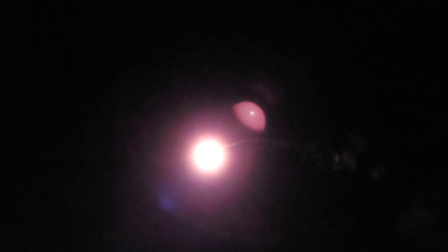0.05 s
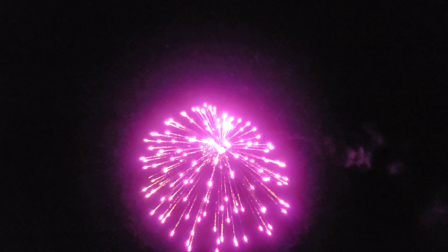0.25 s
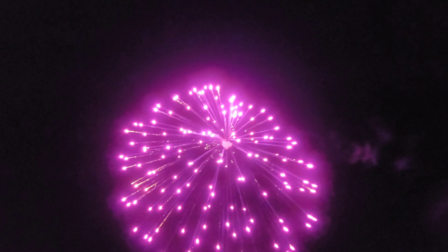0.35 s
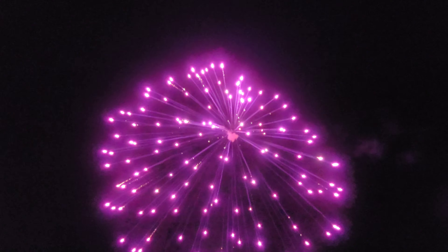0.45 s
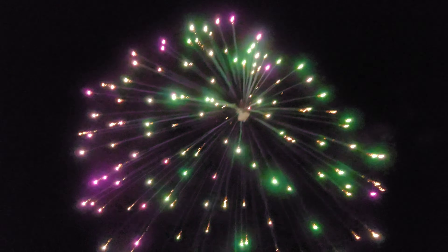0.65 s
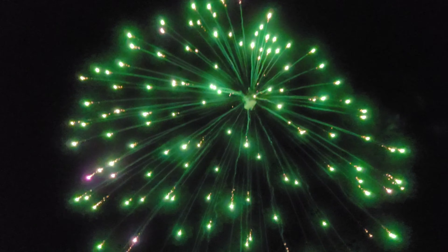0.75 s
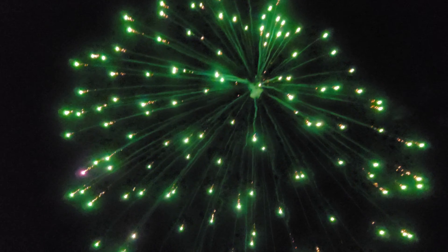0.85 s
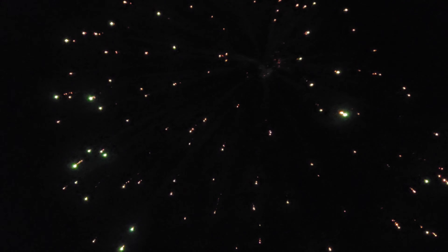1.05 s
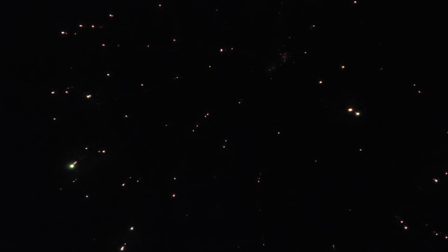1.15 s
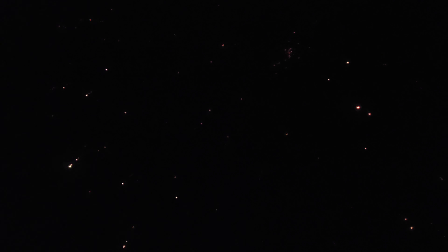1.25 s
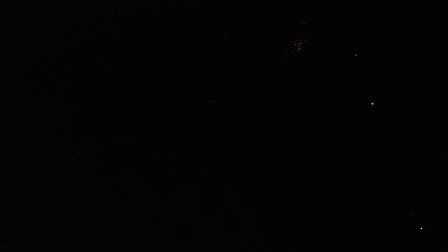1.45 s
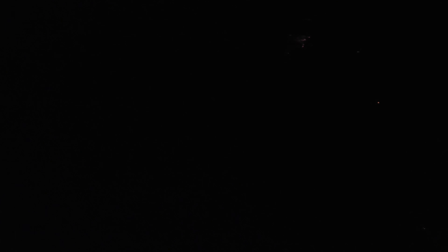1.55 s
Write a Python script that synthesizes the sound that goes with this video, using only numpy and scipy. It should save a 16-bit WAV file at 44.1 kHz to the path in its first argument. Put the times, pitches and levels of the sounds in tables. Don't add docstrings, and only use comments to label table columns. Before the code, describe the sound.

Single hard firework explosion at night, quick slapping echoes, then a deep fading boom over open ground

```python
import sys
import numpy as np
from scipy import signal
from scipy.io import wavfile

SR = 44100
rng = np.random.default_rng(int(sys.argv[2]) if len(sys.argv) > 2 else 0)


def voltage_ratio(level):
    return 10 ** (np.asarray(level, float) / 20)


def master_out(mix):
    frames = np.transpose(np.atleast_2d(mix))
    ceiling = np.clip(frames, -1, 1)
    pcm = np.round(ceiling * 32767).astype(np.int16)
    wavfile.write(sys.argv[1], SR, pcm)


N = 70560

SHOCK_S = .2477
LAG_S = .00048


def rms_one(x):
    return x / np.sqrt(np.mean(x ** 2) + 1e-20)


def column(pair):
    return np.array(pair)[:, None]


def at_hz(points, hz):
    table = np.array(points)
    return np.interp(np.log(hz), np.log(table[:, 0]), table[:, 1])


def since(s):
    return np.maximum(np.arange(N) / SR - s + column([0, LAG_S]), 0)


def cut(x, hz, kind, order=2):
    return signal.sosfilt(signal.butter(order, hz, kind, fs=SR, output="sos"), x + 1e-18)


def drift(rate):
    r = np.exp(-80 * np.pi * rate / SR)
    slow = signal.lfilter([1], [1, -2 * r, r * r], rng.standard_normal(N // 40 + 2002))[2000:]
    return np.interp(np.arange(N) / 40, np.arange(len(slow)), rms_one(slow))


# (frequency [Hz], share [0-1])
PORTS_ALIKE = [(60, 0.88), (300, 1), (700, 0.13), (2000, 0.6), (8000, 0)]
# (frequency [Hz], left minus right [dB])
PORT_BALANCE = [(60, 0.5), (380, 1.5), (2380, 0), (15000, -1)]


def banded(spectrum, envelope, patchy_db, lag_s=LAG_S):
    out, power = 0, 0
    edges = 28 * 2 ** np.arange(0, 9.4, 1 / 3)
    lag = int(lag_s * SR) + 1
    white = rng.standard_normal((2, 3, N + 4000))
    for k, (low, high) in enumerate(zip(edges, edges[1:])):
        both, left, right = cut(white[k % 2], [low, high], "band")
        hz = np.sqrt(low * high)
        alike = np.clip(at_hz(PORTS_ALIKE, hz), 0, 1)
        shared = np.array([both[-N - lag:-lag], both[-N:]])
        separate = np.array([left[-N:], right[-N:]])
        pair = np.sqrt(alike) * shared + np.sqrt(1 - alike) * separate
        gain = voltage_ratio(at_hz(spectrum, hz))
        power += gain ** 2 * (high - low) / (SR / 2)
        side = voltage_ratio(at_hz(PORT_BALANCE, hz) / 2 * column([1, -1]))
        flicker = voltage_ratio(patchy_db * drift(14))
        out = out + gain * side * flicker * envelope(hz) * pair
    return out / np.sqrt(power)


# (frequency [Hz], density [dB per Hz])
NIGHT_COLOUR = [(30, -11), (70, -5), (200, -13), (800, -14), (1700, -20.5), (2400, -37), (4000, -32.5),
                (16000, -47)]
NIGHT_DB = -52


def night_air():
    return banded(NIGHT_COLOUR, lambda hz: voltage_ratio(NIGHT_DB), patchy_db=-0.5, lag_s=0)


# (time [s], level [dB])
FAR_CHORUS = [(0, -70), (.25, -65), (.9, -76.5), (1.33, -71), (1.55, -62)]
# (time [s], level [dB])
RASP_PAIRS = [
    (-.06, -67),
    (.06, -65.5),
    (.18, -66.5),
    (.71, -62),
    (.845, -67),
    (.97, -68),
    (1.1, -60.5),
    (1.228, -64.5),
    (1.36, -61.5),
    (1.485, -64),
]
RASP_GAP_S, RASP_LENGTH_S, RASP_FADE_S = .037, .014, .008
RASP_SECOND_DB = 1
RASP_HZ, RASP_WIDTH_HZ = 11500, 2400


def cricket():
    t = np.arange(N) / SR
    shape = voltage_ratio(np.interp(t, *np.transpose(FAR_CHORUS)))
    for s, db in RASP_PAIRS:
        for start, level_db in ((s, db), (s + RASP_GAP_S, db + RASP_SECOND_DB)):
            u = np.maximum(t - start, 0)
            fade = np.exp(-np.maximum(u - RASP_LENGTH_S, 0) / RASP_FADE_S)
            shape = shape + voltage_ratio(level_db) * np.clip(u / 0.0059, 0, 1) * fade
    band = [RASP_HZ - RASP_WIDTH_HZ / 2, RASP_HZ + RASP_WIDTH_HZ / 2]
    return shape * rms_one(cut(rng.standard_normal((2, N)), band, "band"))


# (time [s], peak level [dB], low edge [Hz])
DRY_TICKS = [
    (1.104, -59, 6000),
    (1.396, -67, 6000),
    (1.415, -62, 600),
]


def ticks():
    t = np.arange(N) / SR
    out = 0
    for s, db, hz in DRY_TICKS:
        decay = voltage_ratio(db - 60 * np.maximum(t - s, 0) / 0.0058) * (t > s)
        out = out + decay * cut(rng.standard_normal((2, N)), [hz, 2 * hz + 2000], "band")
    return out


# (time [s], level [dB])
ROLL_LEVEL = [(.3, -38), (.37, -44.5), (.47, -37), (.52, -34), (.6, -35), (.74, -37.5), (1.0, -44.5),
              (1.35, -52), (1.6, -49)]
# (frequency [Hz], density [dB per Hz])
RUMBLE_COLOUR = [(24, -57), (60, -17), (190, -17), (260, 0), (420, 0), (620, -10.5), (1600, -22.5),
                 (5000, -41), (14000, -61.5)]
# (frequency [Hz], extra loss [dB per s])
RUMBLE_AIR_LOSS = [(50, 7), (150, -3.5), (350, 1.5), (1500, -1.5), (4000, 2), (9000, 46), (15000, 73)]


def rumble():
    t = np.arange(N) / SR
    roll_db = np.interp(t, *np.transpose(ROLL_LEVEL), left=-120)

    def envelope(hz):
        return voltage_ratio(roll_db - at_hz(RUMBLE_AIR_LOSS, hz) * (t - 0.6261))
    return banded(RUMBLE_COLOUR, envelope, patchy_db=.5)


# (time [s], level [dB], rise [s], treble tilt [dB per octave])
SCATTER_GROUPS = [
    (0.2575, -25.5, 0.0015, -0.2),
    (0.262, -28.5, 0.005, 3.5),
    (0.295, -25, 0.0057, -4),
    (.328, -30, 0.0054, -4.5),
    (0.358, -30.5, 0.0031, -8.5),
]
# (frequency [Hz], density [dB per Hz])
SCATTER_COLOUR = [(35, -38.5), (60, -10), (150, -4.5), (363, -4), (1040, -15.5), (1910, -21), (4120, -24),
                  (16000, -41)]
# (frequency [Hz], 60 dB decay [s])
SCATTER_DECAY = [(60, 0.44), (300, 0.36), (1000, 0.55), (3000, 0.84), (8000, 0.48), (15000, 0.47)]


def scatter():
    def envelope(hz):
        t60 = at_hz(SCATTER_DECAY, hz)
        octaves = max(np.log2(hz / 2000), 0)
        power = 0
        for s, db, rise, tilt in SCATTER_GROUPS:
            t = since(s)[0]
            level = voltage_ratio(db + tilt * octaves - 60 * t / t60)
            power = power + (np.clip(t / rise, 0, 1) * level) ** 2
        return np.sqrt(power)
    return banded(SCATTER_COLOUR, envelope, patchy_db=2)


# (time [s], level [dB], centre [Hz], 60 dB decay [s])
WALL_SLAPS = [
    (.297, -38, 4000, .08),
    (.306, -34, 2050, .08),
    (.331, -36, 2050, .1),
    (.362, -34, 1100, .07),
]


def slaps():
    out = 0
    for s, db, hz, t60 in WALL_SLAPS:
        t = since(s)
        shape = voltage_ratio(db - 60 * t / t60) * np.clip(t / .004, 0, 1)
        out = out + shape * rms_one(cut(rng.standard_normal((2, N)), [.8 * hz, 1.25 * hz], "band"))
    return out


# (time [s], peak level [dB], pitch [Hz], rise [s], 60 dB decay [s])
RINGING_ECHOES = [
    (.2584, -.8, 345, .0012, .034),
    (.2969, -10.5, 332, .0105, .03),
]
ECHO_SAG = [11000, 500]


def echoes():
    out = 0
    for (s, db, hz, rise, t60), sag in zip(RINGING_ECHOES, ECHO_SAG):
        t = np.maximum(np.arange(N) / SR - s, 0)
        pitch = np.maximum(hz - sag * t, 0.65 * hz) * (t > 0)
        swell = np.clip(t / rise, 0, 1) ** (.5 + 60 * rise)
        decay = voltage_ratio(db - 60 * np.maximum(t - rise, 0) / t60)
        out = out + swell * decay * np.sin(2 * np.pi * np.cumsum(pitch) / SR)
    return out


PUSH_START, PUSH_END, PUSH_S = [.8, .1], [.2, .4], [.0007, .0008]
PULL, PULL_S, PULL_STEEP = [.85, .66], [.0018, .0017], [.9, .5]
FRONT_CUT_HZ, BASS_CUT_HZ = 12000, 34
CRACK_DB, CRACK_T60_S = -29.5, 0.001
SIZZLE_DB, SIZZLE_T60_S, SIZZLE_CUT_HZ = -20, .004, 11500
NEAR_DB, NEAR_T60_S, NEAR_BAND_HZ = -25, .035, [1200, 5000]
BOUNCE_S, BOUNCE_RISE_S = [.25, .2496], [.0005, .0009]
BOUNCE_HOLD_S, BOUNCE_FALL_S, BOUNCE_DB = .0015, [.0009, .0013], -5.5
THUMP_HZ, THUMP_DB, THUMP_T60_S = 61, [-16, -12], .11


def pressure_front():
    t = since(SHOCK_S)
    u = t / column(PUSH_S)
    start, end = column(PUSH_START), column(PUSH_END)
    push = (start + (end - start) * u ** 2) * (u > 0) * (u < 1)
    v = np.clip((t - column(PUSH_S)) / column(PULL_S), 0, 1)
    pull = column(PULL) * (v < 1) * np.abs(np.sin(np.pi * v)) ** column(PULL_STEEP)
    return cut(push - pull, FRONT_CUT_HZ, "low")


def crack():
    t = since(SHOCK_S)[0]
    out = voltage_ratio(CRACK_DB - 60 * t / CRACK_T60_S) * (t > 0) * rng.standard_normal((2, N))
    for db, t60, hz, kind in ((SIZZLE_DB, SIZZLE_T60_S, SIZZLE_CUT_HZ, "high"),
                              (NEAR_DB, NEAR_T60_S, NEAR_BAND_HZ, "band")):
        out = out + voltage_ratio(db - 60 * t / t60) * (t > 0) * cut(rng.standard_normal((2, N)), hz, kind)
    return out


def ground_bounce():
    late = np.maximum(np.arange(N) / SR - column(BOUNCE_S), 0)
    rise = column(BOUNCE_RISE_S)
    fall = np.exp(-np.maximum(late - rise - BOUNCE_HOLD_S, 0) / column(BOUNCE_FALL_S))
    return voltage_ratio(BOUNCE_DB) * np.clip(late / rise, 0, 1) * fall


def shock():
    t = since(SHOCK_S)
    thump = voltage_ratio(column(THUMP_DB) - 60 * t / THUMP_T60_S) * np.sin(2 * np.pi * THUMP_HZ * t)
    return cut(pressure_front() + crack() + ground_bounce() + thump, BASS_CUT_HZ, "high")


DUCK_DB, RECOVER_DB_PER_S = -22.5, 2.5


def scene():
    t = since(SHOCK_S)[0]
    duck = voltage_ratio((DUCK_DB + RECOVER_DB_PER_S * t) * np.clip(t / 0.0058, 0, 1))
    background = duck * (night_air() + cricket()) + ticks()
    returns = rumble() + scatter() + slaps() + echoes()
    return background + returns + shock()


# (frequency [Hz], width [Hz], level [dB])
CASING_PEAKS = [(1930, 410, 2.5), (2550, 230, 1), (4000, 1160, 1.5), (12000, 1000, 4)]


def casing(x):
    for hz, width, db in CASING_PEAKS:
        b, a = signal.iirpeak(hz, hz / width, fs=SR)
        x = x + (voltage_ratio(db) - 1) * signal.lfilter(b, a, x)
    return x


def roll_off(x):
    return signal.sosfilt(signal.butter(12, 16990, fs=SR, output="sos"), x)


LIMIT, HISS_DB, CUTOFF_HZ = .96, -100, 16000


def record(dry):
    wet = np.clip(casing(dry), -LIMIT, LIMIT)
    wet = wet + voltage_ratio(HISS_DB) * rng.standard_normal(dry.shape)
    top_cut = signal.cheby2(12, 70, CUTOFF_HZ + 600, fs=SR, output="sos")
    wet = signal.sosfilt(top_cut, wet)
    return roll_off(wet)


dry = scene()
out = record(dry)
master_out(out)
```